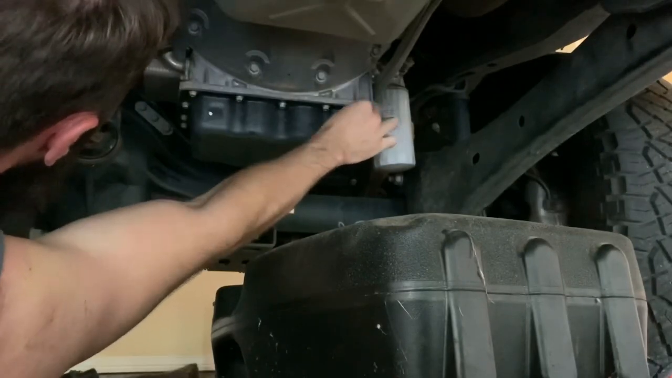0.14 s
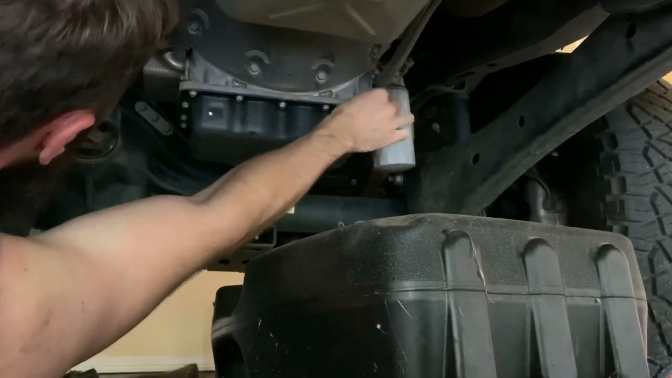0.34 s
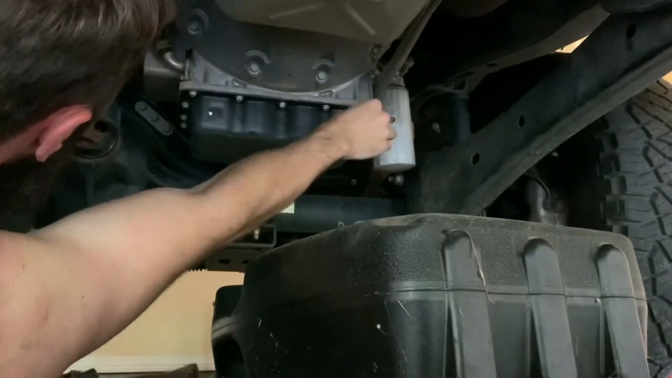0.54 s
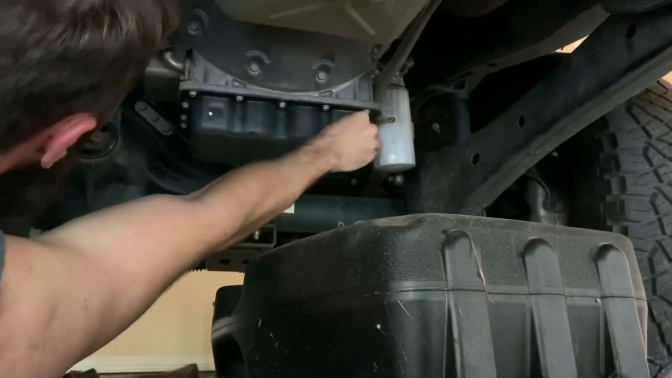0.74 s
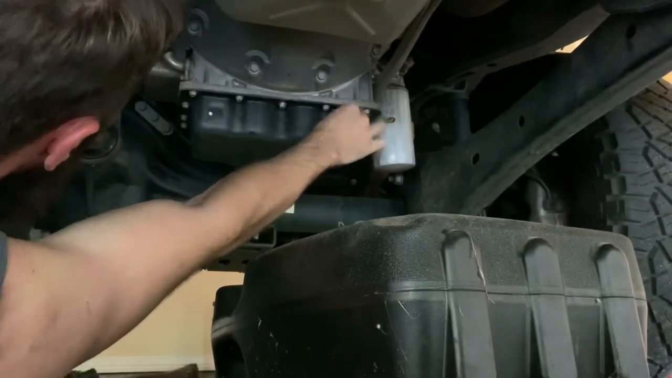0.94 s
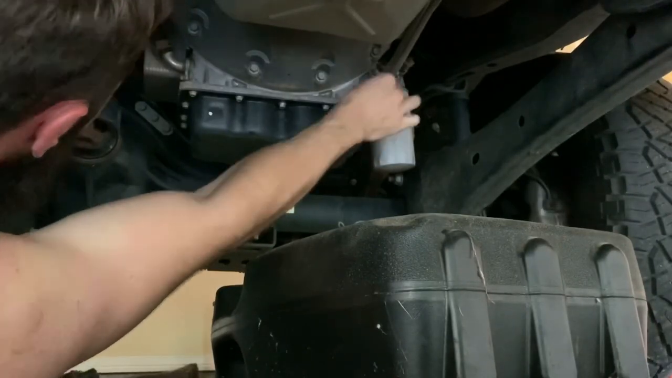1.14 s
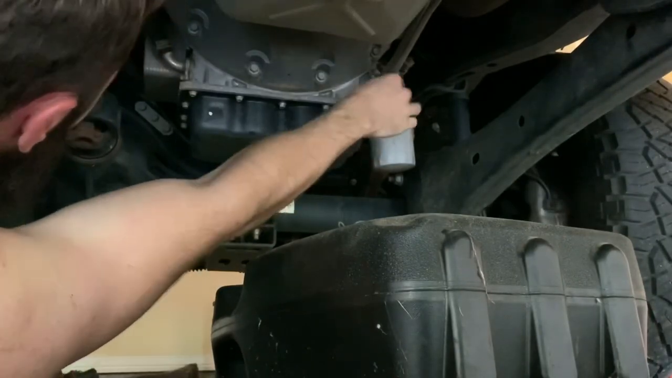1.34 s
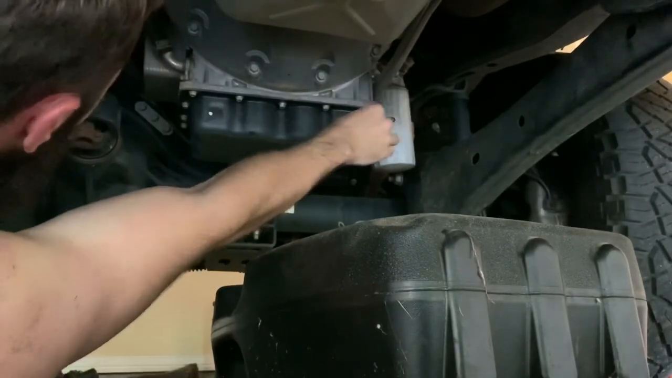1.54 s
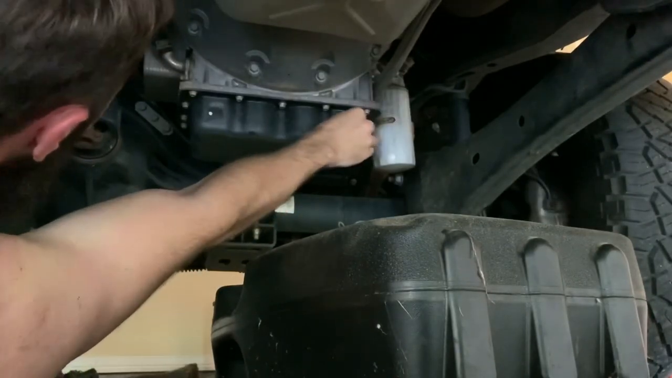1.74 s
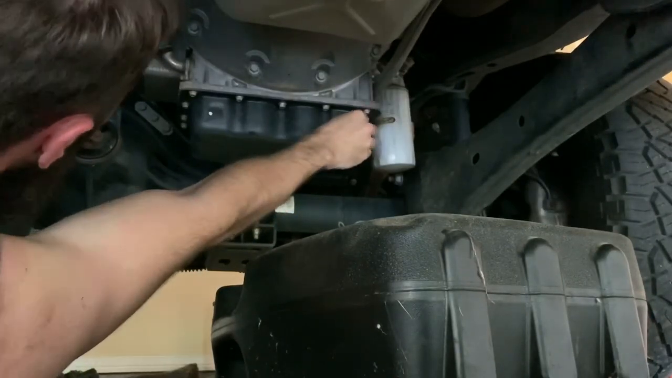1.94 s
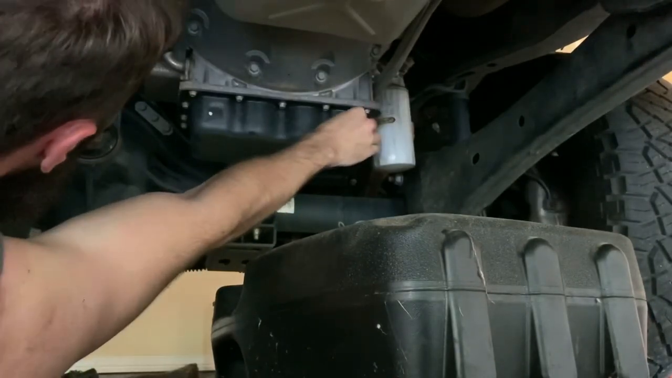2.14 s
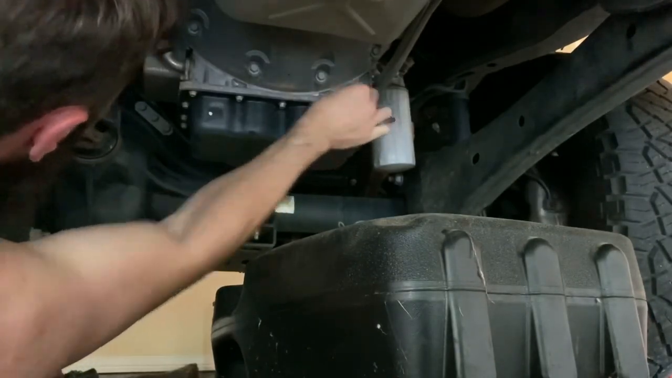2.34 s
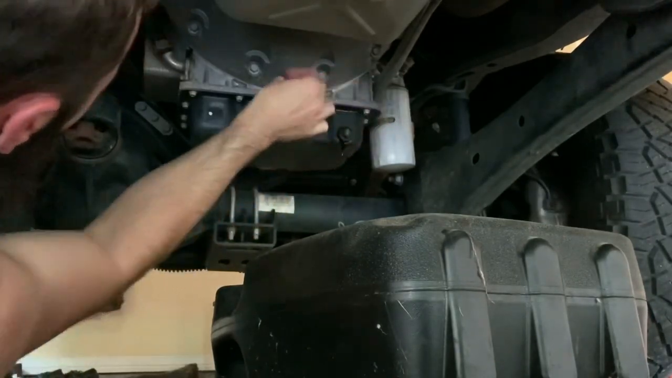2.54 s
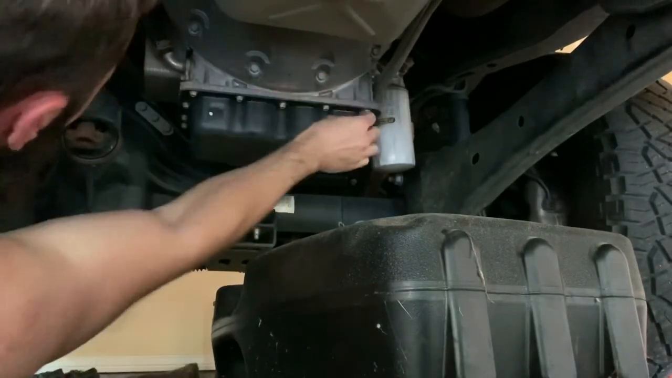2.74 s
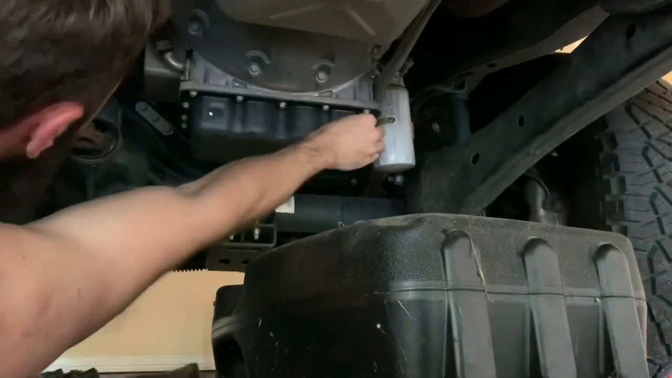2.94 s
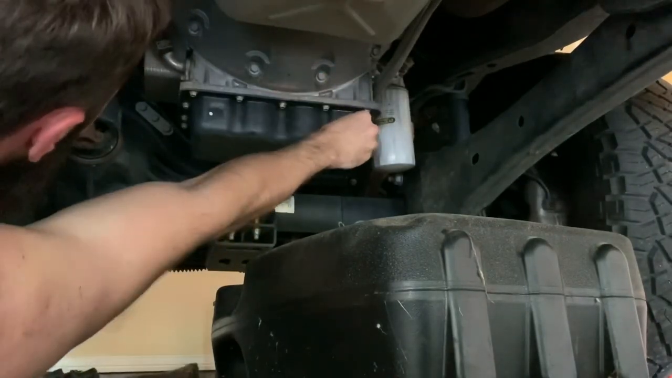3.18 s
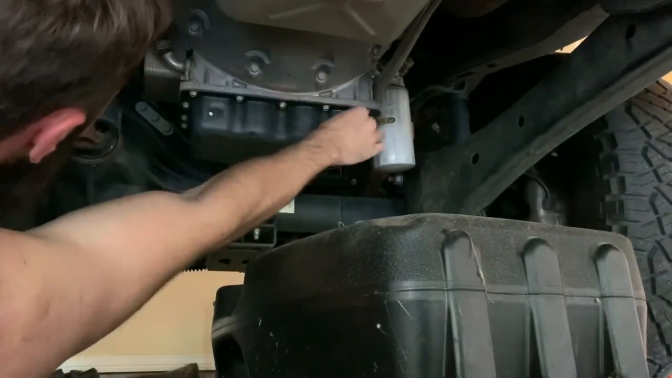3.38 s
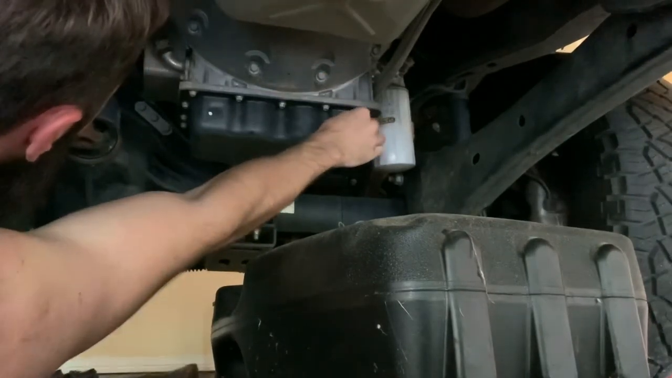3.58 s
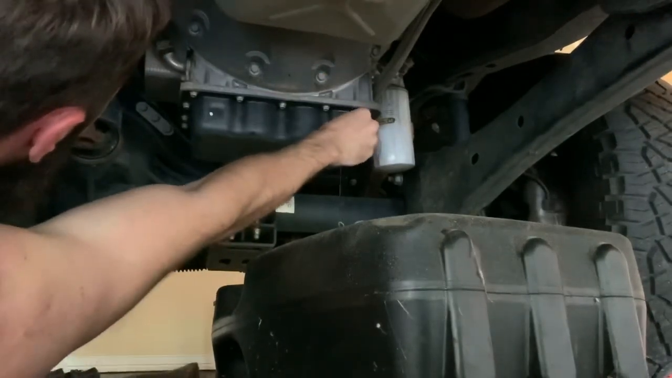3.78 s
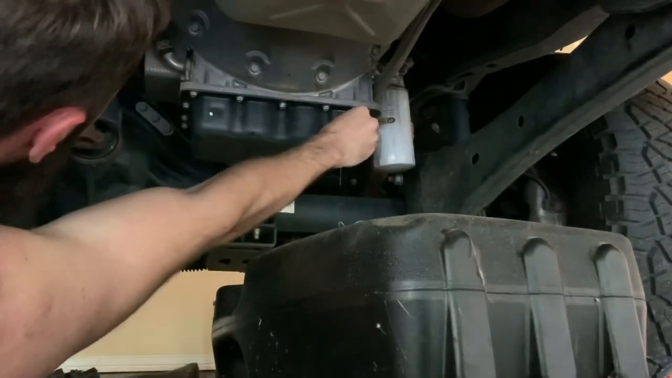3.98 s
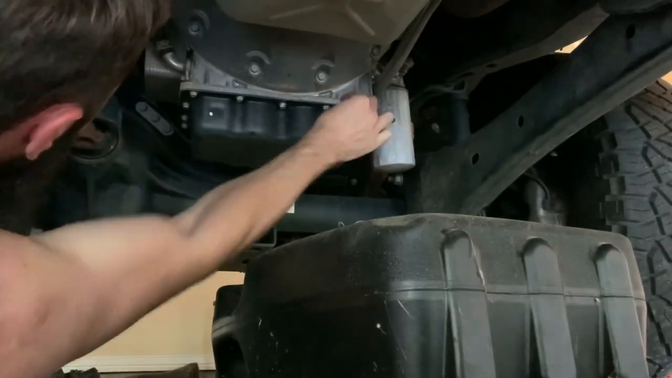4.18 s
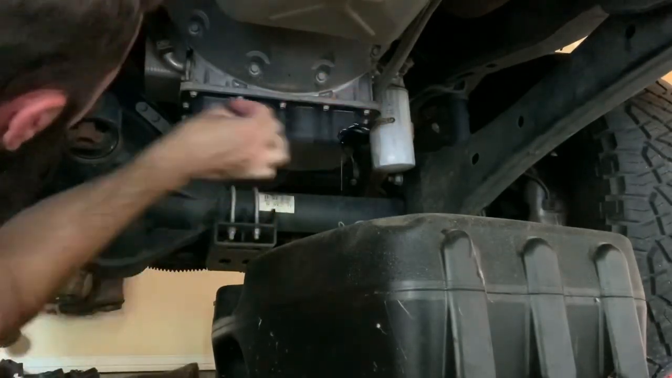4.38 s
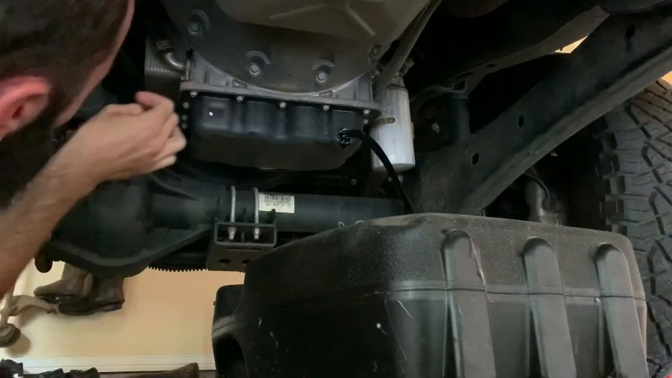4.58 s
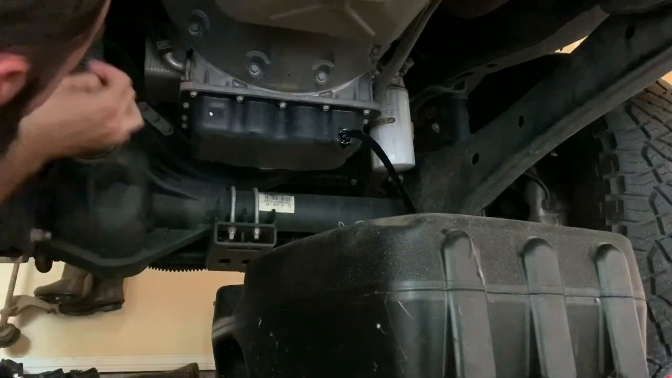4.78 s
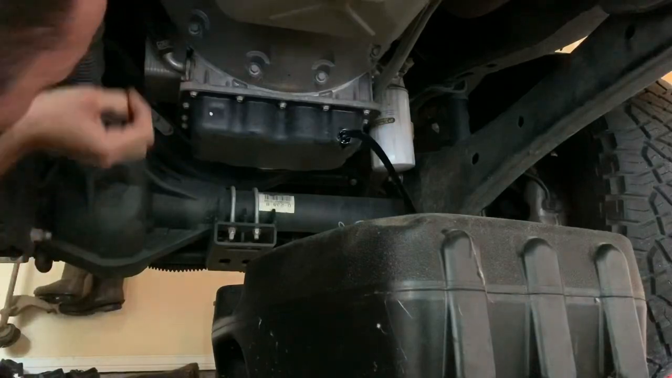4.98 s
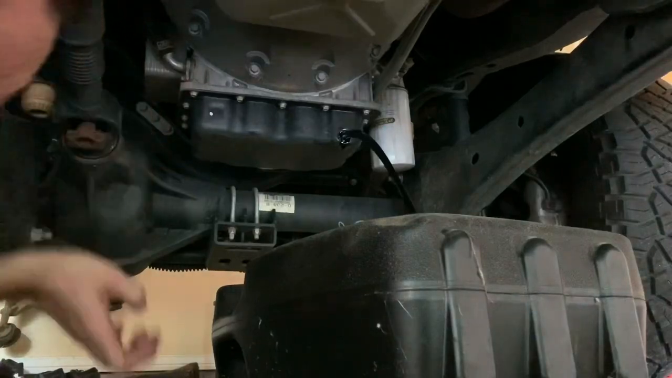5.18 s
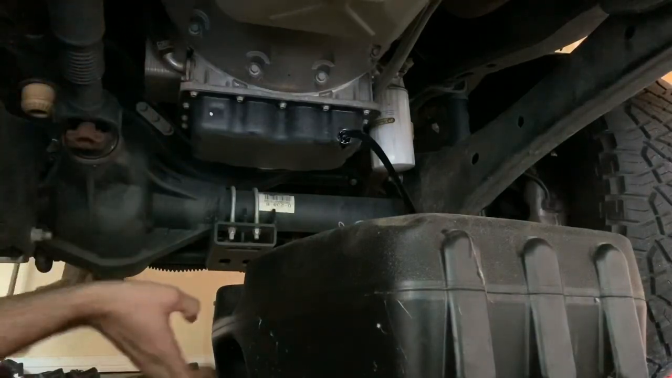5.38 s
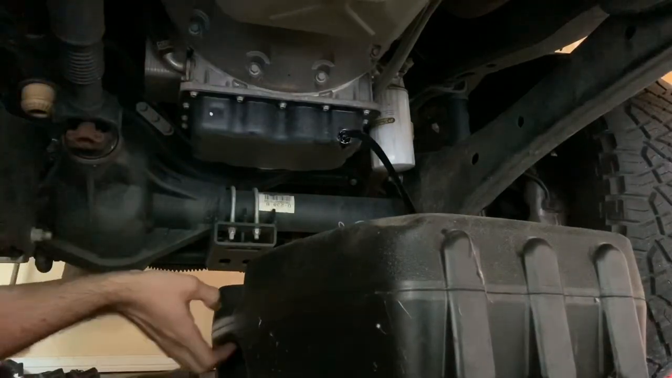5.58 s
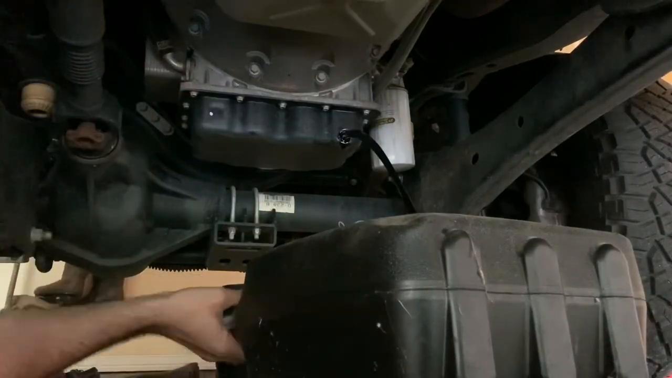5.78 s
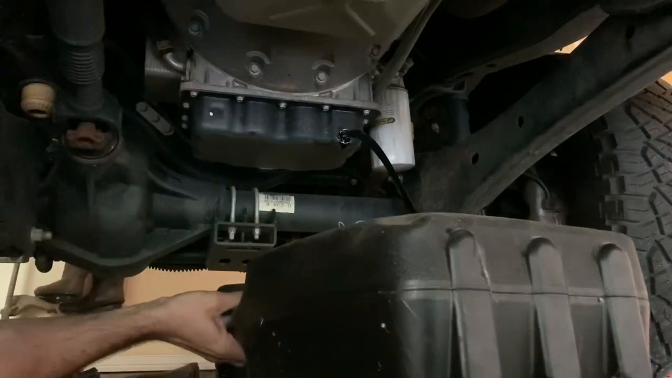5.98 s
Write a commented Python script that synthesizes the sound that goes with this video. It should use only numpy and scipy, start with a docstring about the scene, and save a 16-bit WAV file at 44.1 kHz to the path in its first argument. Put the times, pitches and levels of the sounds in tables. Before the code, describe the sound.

Fingers tick a drain plug loose, it clacks free, oil drums into an empty plastic pan, then hisses softly as the pan is shoved.

```python
"""An oily drain plug comes out

Under a vehicle in a garage, fingers spin out a drain plug: it ticks and rattles in its thread and clacks free.
Lumps of hot oil drum on an empty plastic pan, then the stream settles to a soft hiss; a sleeve rustles once.
The steel plug is put down, and a hand grabs the pan and shoves it over the concrete.
Knocks are short noises and decaying tones; the stream and the rubbing are showers of tiny random impacts."""
import sys
import numpy as np
from scipy import signal
from scipy.fft import rfft, irfft, next_fast_len
from scipy.io import wavfile
from scipy.ndimage import uniform_filter1d

SR = 44100
rng = np.random.default_rng(int(sys.argv[2]) if len(sys.argv) > 2 else 0)


def dump(signal):
    """Clip the signal to [-1, 1] and save it as 16-bit WAV at the path in sys.argv[1]."""
    limited = np.clip(np.atleast_2d(signal).T, -1, 1)
    pcm = np.round(limited * 32767).astype(np.int16)
    wavfile.write(sys.argv[1], SR, pcm)


N = 265482  # length in samples

# lumps of oil landing together as a slug: t/s, drum level/dB, brightness/Hz, splat level/dB,
# first gap between lumps/s, number of lumps
OIL_SLUGS = [(4.5224, -31, 1200, -22, 0.0075, 1), (4.5266, -15.5, 3200, -9.5, 0.0075, 4),
             (4.626, -27.5, 1390, -33.5, 0.014, 2), (4.7162, -20, 740, -32, 0.016, 2),
             (4.825, -42, 700, -64, 0.015, 1)]
# tones of the pan's floor before oil damps them: f/Hz, level/dB, time to fall 60 dB/s
PAN_FLOOR = [(91.3, -2, 0.93), (141, 0.5, 0.17), (208.3, -3.5, 0.57), (294.1, 5.5, 0.2), (503.5, 7.5, 0.12),
             (545.5, -7, 0.25), (594, 5, 0.068), (783, -4, 0.12), (948, 5, 0.082), (1066, 1.5, 0.046),
             (1167, 5, 0.055), (1564, 3, 0.043), (1700, 15, 0.013), (2240, -1, 0.025), (2435, 7, 0.025),
             (3370, -26, 0.022)]


def amp(db):
    """Decibels to gain."""
    return 10 ** (np.asarray(db) / 20)


def unit(x):
    """Scaled to rms 1."""
    return x / np.sqrt(np.mean(x ** 2) + 1e-20)


def along(points, hz):
    """Read a curve of (Hz, value) points on a log frequency axis."""
    f, value = np.transpose(points)
    return np.interp(np.log(hz + 1), np.log(f + 1), value)


def filtered(x, response):
    """Multiply the spectrum of x by a response, a function of frequency."""
    n = x.shape[-1]
    padded = next_fast_len(n + 8192)  # spare room for the filter's tail
    spectrum = rfft(x, padded) * response(np.fft.rfftfreq(padded, 1 / SR))
    return irfft(spectrum, padded)[..., :n]


def coloured(x, colour):
    """Two unrelated signals become a stereo pair of rms 1, alike in the bass."""
    # how alike left and right are: f/Hz, likeness (1 = the same, 0 = unrelated)
    likeness = [(60, 0.96), (130, 0.94), (290, 0.79), (640, 0.22), (1400, -0.41), (3100, 0.28),
                (15000, 0.092)]

    def mid_side(hz):
        turn = np.arccos(np.clip(along(likeness, hz), -1, 1)) / 2
        return amp(along(colour, hz)) * [np.cos(turn), np.sin(turn)]

    mid, side = filtered(x, mid_side)
    return unit(np.array([mid + side, mid - side]))


def softened(rows, bright_hz):
    """A soft contact cuts the levels of (Hz, dB, ..) rows above its brightness."""
    return [(hz, db - 10 * np.log10(1 + (hz / bright_hz) ** 4), *rest) for hz, db, *rest in rows]


def noise(size):
    """Two channels of white noise."""
    return rng.standard_normal((2, size))


def grains(rate, spread_db):
    """Random tiny impacts, rate a second, of uneven size."""
    hits = rng.random(N) < rate / SR
    return unit(noise(N) * hits * amp(spread_db * rng.standard_normal(N)))


def patchy(x, depth_db):
    """Random patches of gain, about 1000 Hz wide and 0.03 s long."""
    z = signal.stft(x, nperseg=512)[2]
    field = rng.standard_normal(z.shape[1:])
    field = uniform_filter1d(field, size=12, axis=0)
    field = uniform_filter1d(field, size=5, axis=1)
    return unit(signal.istft(z * amp(depth_db * unit(field)), nperseg=512)[1][:, :N])


def fade(t60, attack):
    """One second of a rise and a decay; t60 is the seconds to fall by 60 dB."""
    t = np.arange(SR) / SR
    return amp(-60 * t / t60) * (1 - np.exp(-t / attack))


def swell(s, rise, fall, hold=0):
    """A gain that climbs to 1 at a time, holds and dies; rise and fall are the seconds for a tenfold change."""
    t = np.arange(N) / SR - s
    return 10 ** (np.minimum(t, 0) / rise - np.maximum(t - hold, 0) / fall)


def burst(colour, t60, attack=0.00031):
    """The brief noise of one contact."""
    return coloured(noise(SR), colour) * fade(t60, attack)


def ring(modes, blur_hz, right_lead, attack):
    """Decaying tones of wandering pitch; the right channel's waves run right_lead seconds ahead."""
    t = np.arange(SR) / SR
    leads = np.array([[0], [right_lead]])
    out = np.zeros((2, SR))
    for k, (hz, db, t60) in enumerate(modes):
        wander = np.cumsum(rng.standard_normal(SR)) * np.sqrt(2 * np.pi * blur_hz / SR)
        wander = uniform_filter1d(wander, int(4 * SR / hz) + 1)  # smoothed over four cycles
        phase = 2 * np.pi * hz * (t + leads) + wander
        out += (-1) ** k * amp(db + rng.normal()) * np.sin(phase) * fade(t60, attack)
    return out


def resonances(modes, f):
    """Frequency response of resonators, rows (Hz, width Hz, gain), with alternating signs."""
    return sum((-1) ** k * gain * 1j * f / (hz * hz - f * f + 1j * f * width)
               for k, (hz, width, gain) in enumerate(modes))


def add(track, s, sound):
    """Mix a sound into a track at a time."""
    part = track[:, max(round(s * SR), 0):][:, :sound.shape[1]]
    part += sound[:, :part.shape[1]]


def placed(x, wet_db, left_db):
    """A source leaning to one side, with the garage's echo made from decaying noise."""
    # how long the garage echoes: f/Hz, time to fall 60 dB/s
    echo_times = [(100, 0.12), (500, 0.49), (3000, 0.4), (8000, 0.4), (15000, 0.21)]
    hz, t, z = signal.stft(noise(SR // 2), SR, nperseg=256)
    decay = amp(-60 * t / along(echo_times, hz)[:, None])
    tail = signal.istft(z * decay, SR, nperseg=256)[1]
    tail = coloured(tail, [(20, 0), (20000, 0)]) / np.sqrt(tail.shape[1])
    echo = signal.fftconvolve(x, tail, axes=1)[:, :N]
    return (x + amp(wet_db) * echo) * amp([[left_db / 2], [-left_db / 2]])


def garage():
    """A steady low rumble, leaning right, and a faint hiss: two layers of shaped noise."""
    # colour of the rumble: f/Hz, relative level/dB per Hz
    rumble_colour = [(15, -45), (25, -35), (38, -5), (91, 1.5), (120, -5), (157, -11), (176, -15),
                     (205, -9.5), (273, -11.5), (364, -21), (564, -18.5), (603, -12), (667, -20),
                     (1090, -15.5), (1400, -30.5), (1820, -111), (3080, -120)]
    # colour of the hiss: f/Hz, relative level/dB per Hz
    air_colour = [(600, -36), (1200, 6), (2200, 1), (3200, -10), (4500, -18.5), (8500, -28), (10200, -4),
                  (11500, -25.5), (13500, -15), (16000, -27)]
    rumble = amp(-48.0) * coloured(noise(N), rumble_colour)
    hiss = amp(-64) * coloured(noise(N), air_colour)
    return rumble * amp([[-1.2], [1.2]]) + hiss


def bumps():
    """Soft hand and arm touch, then press, waking a few low, quickly damped tones of the hollow pan."""
    # t/s, level/dB, pitch/Hz
    touches = [(2.631, -47, 291), (2.793, -43.5, 408), (3.001, -39, 82), (5.115, -37.5, 217),
               (5.203, -43, 543), (5.319, -47, 390), (5.428, -24.5, 205.6), (5.438, -29, 82),
               (5.853, -28.5, 327), (5.942, -30, 404), (5.984, -24, 280)]
    # the weight follows the first touch and wakes a deeper swing
    press_s, press_pitch, press_db = 0.0185, 0.63, -2.9
    out = np.zeros((2, N))
    for start, level, pitch in touches:
        press = (start + press_s, level + press_db, pitch * press_pitch)
        for s, db, hz in [(start, level, pitch), press]:
            t60 = 0.33 * (200 / hz) ** 0.78  # 0.33 s at 200 Hz; higher tones die sooner
            modes = [(hz * .8, -9, t60), (hz, -2, t60), (hz * 1.27, -8, t60 * 0.86), (hz * 1.3, -16, t60 * .5)]
            add(out, s, amp(db) * ring(modes, blur_hz=1.3, right_lead=.0001, attack=0.0022))
    return placed(out, wet_db=-10.0, left_db=-3.5)


def shove():
    """The pan's foot catches and slips on concrete: its walls sing, and fine grit crunches under it."""
    # slides: t of the peak/s, rise/s, fall/s (for a tenfold change), rubbing level/dB, grit level/dB
    slides = [(5.758, 0.12, 0.14, -36, -67), (5.86, 0.076, 0.23, -46.5, -57),
              (5.947, 0.015, 0.13, -48, -36), (5.988, 0.05, 0.12, -47, -27)]
    # resonances of the pan's walls: f/Hz, width/Hz, level/dB
    wall_modes = [(60.4, 13, 5), (243, 29, -3.5), (580, 37, -5.5), (725, 23, -3), (904, 17, 0.5),
                  (1027, 37, -6), (1453, 82, -8), (2610, 190, -15.5), (7060, 2500, -26.5)]
    # colour of the grit: f/Hz, relative level/dB per Hz
    grit_colour = [(120, 4), (250, 1.5), (850, -6.5), (1300, -17), (2000, -14), (3000, -21.5),
                   (6200, -26.5), (13400, -33.5), (16000, -35)]
    rub, grit = sum(amp([[rub_db], [grit_db]]) * swell(s, rise, fall)
                    for s, rise, fall, rub_db, grit_db in slides)
    modes = [(hz, width, amp(db) * width) for hz, width, db in wall_modes]
    singing = filtered(grains(rate=1500, spread_db=0.5), lambda f: resonances(modes, f))
    rubbing = coloured(singing, [(100, 0.5), (1500, 2), (14000, -6)])
    crunch = patchy(coloured(grains(rate=4000, spread_db=4.5), grit_colour), depth_db=3.0)
    return placed(rub * rubbing + grit * crunch, wet_db=-1.5, left_db=-0.5)


def plug_down():
    """The plug touches down, bounces and rings roughly once the fingers let go."""
    # contacts: t/s, contact level/dB, ring level/dB
    contacts = [(5.158, -27, -67), (5.162, -19, -49), (5.178, -30.5, -64), (5.209, -23, -30),
                (5.296, -36.5, -56)]
    # tones of the steel plug: f/Hz, level/dB, time to fall 60 dB/s
    plug_modes = [(4030, -22, 0.073), (4800, 0, 0.17), (5900, -10.5, 0.15), (9800, 3, 0.082),
                  (10800, -15, 0.3), (10720, 3.5, 0.08), (13130, -14, 0.26)]
    # colour of the contact noise: f/Hz, relative level/dB per Hz
    contact_colour = [(200, 3), (1000, -2), (2200, -6.5), (3500, -3.5), (6000, -3.5), (8000, -11),
                      (10500, 3), (13500, -3.5), (16000, -20)]
    out = np.zeros((2, N))
    for s, contact_db, ring_db in contacts:
        shiver = ring(plug_modes, blur_hz=75, right_lead=-.0003, attack=.002)
        contact = burst(contact_colour, t60=0.042, attack=0.0021)
        add(out, s, amp(contact_db) * contact + amp(ring_db) * shiver)
    return placed(out, wet_db=-8, left_db=-0.5)


def crackle(count):
    """Rows (s, dB, Hz) of small snaps, count of them scattered along each twist of the fingers."""
    # twists: t/s, length/s, middle level of the snaps/dB
    twists = [(0.076, 0.22, -56.5), (0.52, 0.13, -53.5), (0.769, 0.26, -45.5), (1.554, 0.23, -57),
              (1.794, 0.17, -52.5), (2.247, 0.2, -53)]
    rows = []
    for s, length, db in twists:
        for k in range(count):
            when = s + length * (k + rng.random()) / count
            level = db + 5 * rng.normal()
            hz = 13800 * 2 ** (0.18 * rng.normal())  # scattered by 0.18 octave
            rows.append((when, level, hz))
    return rows


def oil_film():
    """The sticky film of oil parts in tiny snaps, mostly very high: short bursts of narrow noise."""
    # single snaps: t/s, level/dB, pitch/Hz
    single_snaps = [(0.0653, -38.5, 14500), (0.691, -42.5, 14200), (0.843, -35, 14800),
                    (0.8552, -38.5, 10300), (1.0243, -46, 6360), (1.06, -48, 7660), (1.1172, -38.5, 14300),
                    (2.0246, -51.5, 7400), (2.271, -46, 7600), (2.4286, -40.5, 11600), (2.458, -38, 14600),
                    (2.5173, -50, 5900), (3.0739, -52, 14100)]
    # colour of a snap: multiple of its pitch, relative level/dB per Hz
    snap_shape = [(.35, -34), (.75, -15), (1, 0), (1.3, -13), (2.2, -28)]
    out = np.zeros((2, N))
    for s, db, hz in single_snaps + crackle(count=8):
        colour = [(hz * multiple, level) for multiple, level in snap_shape]
        add(out, s, amp(db) * burst(colour, t60=0.033, attack=0.00047))
    return placed(out, wet_db=-4, left_db=-1)


def thread():
    """The loose plug rocks: steel grinds briefly on steel, damped by the fingers, in uneven noise."""
    # t of the last touch/s, its level/dB, its brightness/Hz, number of touches
    rattles = [(0.0468, -42, 4900, 1), (0.094, -52, 7050, 1), (0.926, -41.5, 4970, 1),
               (0.9535, -41, 7160, 1), (1.2505, -49, 6130, 1), (1.519, -47, 900, 1),
               (2.1835, -34.5, 8100, 2), (3.368, -52.5, 3540, 1), (3.9807, -34.5, 3300, 1),
               (4.093, -41, 3000, 1)]
    # colour of the grinding: f/Hz, relative level/dB per Hz
    grind_colour = [(350, -5.5), (600, 6.5), (1300, -0.5), (2100, 4), (3500, 1.5), (5000, -3), (6600, -3),
                    (8000, -13), (10000, -5), (14000, -18)]
    # an earlier touch comes this much sooner, lighter and duller
    sooner_s, lighter_db, duller = 0.0275, 10, 0.56
    out = np.zeros((2, N))
    for s, db, bright_hz, touches in rattles:
        for k in range(round(touches)):
            colour = softened(grind_colour, bright_hz * duller ** k)
            touch = patchy(coloured(noise(SR), colour), depth_db=1.2)[:, :SR]
            add(out, s - k * sooner_s, amp(db - k * lighter_db) * touch * fade(0.096, 0.0016))
    return placed(out, wet_db=-6, left_db=1.0)


def release():
    """The last turn of thread scrapes apart and the plug knocks the sump, which rings."""
    # knocks: t/s, level/dB, brightness/Hz
    knocks = [(4.11, -16.5, 18100), (4.152, -26, 7740), (4.279, -37.5, 7940)]
    # tones of the sump: f/Hz, level/dB, time to fall 60 dB/s
    sump_modes = [(788, 3.5, 0.24), (940, -2.5, 0.38), (1070, 0.5, 0.28), (1180, -9, 0.24), (3026, 6, 0.1),
                  (3160, -2, .2), (3430, -20, 0.38), (4290, 5.5, 0.11), (5200, 2, 0.12)]
    # colour of scrape and crack: f/Hz, relative level/dB per Hz
    knock_colour = [(300, -22), (600, -8.5), (800, -18), (1100, -8.5), (1700, -12.5), (3100, -3),
                    (4500, -7.5), (6500, -8), (7600, -14.5), (10000, -3.5), (13500, -19), (15500, -27)]
    out = np.zeros((2, N))
    for s, db, bright_hz in knocks:
        colour = softened(knock_colour, bright_hz)
        scrape = coloured(grains(rate=700, spread_db=3)[:, :SR], colour) * fade(.16, .003)
        crack = burst(colour, t60=.032, attack=.0003)
        clang = ring(sump_modes, blur_hz=21, right_lead=.0001, attack=0.00066)
        add(out, s - .003, amp(db - 12.0) * scrape)
        add(out, s, amp(db) * crack + amp(db - 19.0) * clang)
    return placed(out, wet_db=-7, left_db=-0.5)


def flow():
    """Gains of drumming and hiss: a gush on the bare floor gives way to a steady pour into the pool."""
    land_s, pooled_s, pour_s = 4.535, 4.83, 5.115  # jet lands; a pool has formed; the pour is at full strength

    def since(s):
        return np.maximum(np.arange(N) / SR - s, 0)

    sagging = amp(-26 - 26.5 * since(land_s))  # the gush loses 26.5 dB a second
    gush = sagging * swell(land_s, rise=0.04, fall=0.043, hold=pooled_s - land_s)
    splash = amp(-46) * swell(land_s, rise=0.039, fall=0.068)  # spray thrown up by the first oil
    rustle = amp(-51) * swell(4.985, rise=0.021, fall=0.033)  # a sleeve rustles once as the arm moves
    pour = swell(pour_s, rise=0.62, fall=np.inf) * (since(land_s) > 0)
    pour_hiss = amp(-52.5 - 5.5 * since(pour_s)) * pour
    return gush + amp(-47.5) * pour, splash + rustle + pour_hiss


def stream():
    """The jet keeps the wet floor drumming until a pool cushions it; a soft hiss goes on."""
    # colour of the hiss, which also serves the sleeve's rustle: f/Hz, relative level/dB per Hz
    hiss_colour = [(500, -24), (900, 9), (1400, -7), (2200, -5), (3500, -8), (6500, -13.5), (10200, -14.5),
                   (13500, -16.5), (16000, -27)]
    modes = [(hz, 5.7 / t60 + 0.042 * hz, amp(db)) for hz, db, t60 in PAN_FLOOR]  # oil widens each resonance
    floor = filtered(grains(rate=350, spread_db=2.0), lambda f: resonances(modes, f))
    drum = coloured(floor, [(90, 10), (250, -3.0), (1000, -3), (3000, -20.0), (12000, -29)])
    hiss = patchy(coloured(grains(rate=2800, spread_db=0.0), hiss_colour), depth_db=3.0)
    drumming, hissing = flow()
    return placed(drumming * drum + hissing * hiss, wet_db=-4.0, left_db=0.0)


def lumps():
    """Rows (s, dB, brightness Hz, splat dB): each slug arrives as ever later, softer and duller lumps."""
    rows = []
    for s, db, bright_hz, splat_db, gap, count in OIL_SLUGS:
        for k in range(round(count)):  # each lump lands on the oil of the one before
            when = s + gap * k ** 1.35  # later lumps fall behind
            rows.append((when, db - 3 * k, bright_hz * 0.68 ** k, splat_db - 3.5 * k * k))
    return rows


def slugs():
    """Lumps of oil slap the bare pan; the spreading film of oil damps its tones and makes their pitch waver."""
    # colour of the splat: f/Hz, relative level/dB per Hz
    splat_colour = [(150, -12), (500, 8.5), (1200, -3.5), (1700, -1.5), (2500, -7), (4000, -16.5),
                    (9000, -22.5), (15000, -26.5)]
    first_s = OIL_SLUGS[0][0]
    out = np.zeros((2, N))
    for s, db, bright_hz, splat_db in lumps():
        cover = np.clip((s - first_s) / 0.028, 0, 1)  # from bare floor to oil-covered in 0.028 s
        # the oil's weight holds down the deepest swing and soaks up the high tones
        damped = [(hz, level - 9 * cover * (90 / hz) ** 2, t60 / (1 + cover * hz / 700))
                  for hz, level, t60 in softened(PAN_FLOOR, bright_hz)]
        boom = ring(damped, blur_hz=3 + 14 * cover, right_lead=.00008, attack=0.002)
        splat = burst(softened(splat_colour, 7 * bright_hz), t60=0.029 + 0.015 * cover, attack=0.00017)
        add(out, s, amp(db) * boom + amp(splat_db) * splat)
    return placed(out, wet_db=-13.5, left_db=-3.5)


def scene():
    """Everything under the vehicle."""
    handling = bumps() + shove() + plug_down()
    unscrewing = oil_film() + thread() + release()
    oil = stream() + slugs()
    return garage() + handling + unscrewing + oil


def record(dry):
    """Round off peaks near full scale, colour the top octave and keep nothing from 16200 Hz up."""
    # colour of the microphone: f/Hz, level/dB
    mic_colour = [(10900, 1), (11800, -14.5), (12900, 5.5), (14400, 1), (15300, -5), (16200, -39)]
    held = dry / (1 + np.abs(dry) ** 6) ** (1 / 6)
    return filtered(held, lambda hz: amp(along(mic_colour, hz)) * (hz < 16200))


dry = scene()
out = record(dry)
dump(out)
```